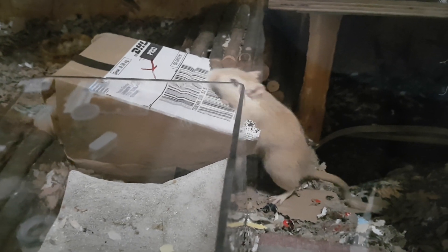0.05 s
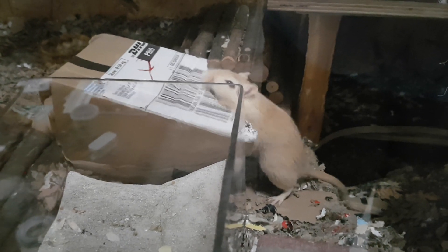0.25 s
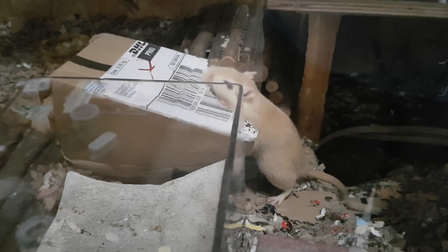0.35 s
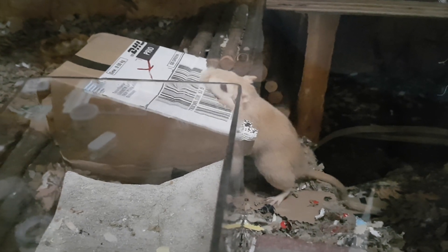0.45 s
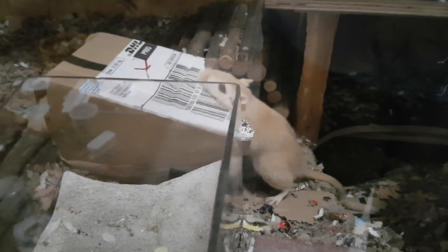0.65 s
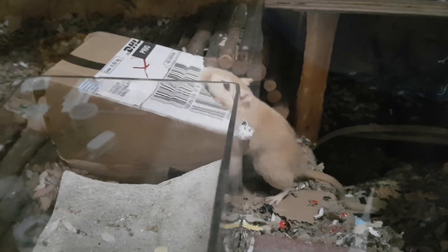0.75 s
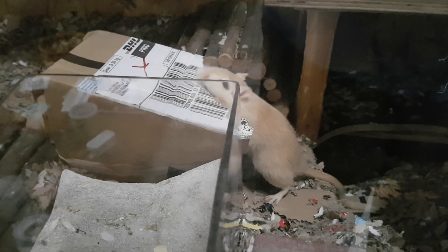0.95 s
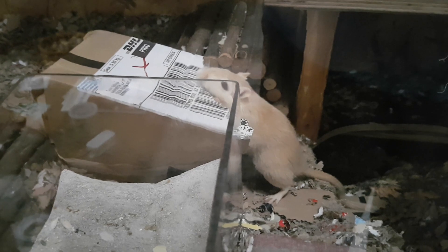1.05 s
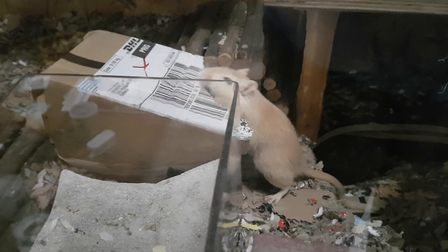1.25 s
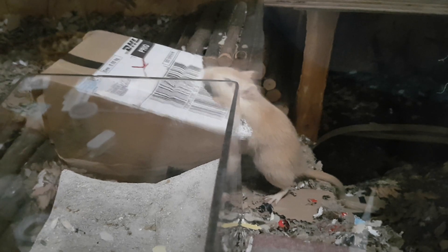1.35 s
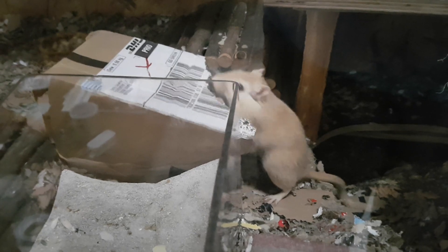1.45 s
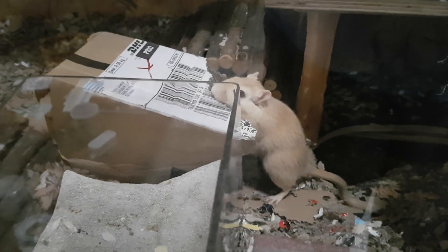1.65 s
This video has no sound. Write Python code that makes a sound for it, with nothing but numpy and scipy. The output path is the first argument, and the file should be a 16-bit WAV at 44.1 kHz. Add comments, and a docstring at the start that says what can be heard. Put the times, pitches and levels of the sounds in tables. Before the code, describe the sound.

A small rodent gnaws cardboard, slightly right of centre. After faint nibbles and a barely heard bump, a crunch comes at 0.22 s, stronger knocking bites at 0.49 and a close pair at 0.68-0.70, then the loudest, crispest snap at 0.94. A duller bite at 1.10, a weak tear at 1.26 and a light bite with soft low bump at 1.39 follow. Glassy tank echo, live room, quiet steady air.

```python
"""A gerbil gnaws the edge of a cardboard box in a glass tank, in a quiet, fairly live room.
Each bite snaps a burst of fibres, which rings the board, and lets the wall of the box spring back
with a hollow knock. Faint nibbles and paw shuffles fill the gaps. The box bumps very faintly at the
start, then more clearly, but still softly, at the last bite. The tank rings and echoes around it all,
the room adds its own echo, and a steady, quiet room tone lies beneath."""
import sys
import numpy as np
from scipy import signal
from scipy.fft import rfft, irfft
from scipy.io import wavfile
from scipy.ndimage import uniform_filter1d

SR = 44100
rng = np.random.default_rng(int(sys.argv[2]) if len(sys.argv) > 2 else 0)


def unload_wav(signal):
    """Save mono or channel-first audio to the path in sys.argv[1] as 16-bit WAV at rate SR, clipped to [-1, 1]."""
    wavfile.write(
        sys.argv[1],
        SR,
        np.round(np.clip(np.atleast_2d(signal).T, -1, 1) * 32767).astype(np.int16),
    )


N = 74970  # length of the scene in samples


def undb(db):
    """Turn decibels into a gain."""
    return 10 ** (np.asarray(db) / 20)


def unit(x):
    """Scale a sound to an energy of one."""
    return x / np.sqrt(np.sum(x ** 2) + 1e-18)


def steady(x):
    """Scale a sound that fills the scene to an average (RMS) level of one."""
    return unit(x) * np.sqrt(N)


def on_bins(points, values):
    """Join values by straight lines along a log-frequency axis."""
    return np.interp(np.log(np.fft.rfftfreq(N, 1 / SR) + 1), np.log(points), values)


def colour(table):
    """Turn a table of f/Hz, level/dB into a filter response that starts at once (minimum phase)."""
    hz, db = np.array(table).T
    cepstrum = irfft(np.log(undb(on_bins(hz, db))), N)
    # folding the second half onto the first leaves nothing before time zero
    cepstrum[1:N // 2] *= 2
    cepstrum[N // 2 + 1:] = 0
    return unit(irfft(np.exp(rfft(cepstrum)), N))


def ring(modes, size=12000):
    """Add up resonances (f/Hz, width/Hz, peak level/dB): wider ones die sooner; high treble is softened."""
    t = np.arange(size) / SR
    modal = np.zeros(size)
    for hz, width, db in modes:
        decay = np.exp(-np.pi * width * t)
        modal += undb(db) * width * decay * np.cos(2 * np.pi * hz * t)
    soften = signal.butter(3, 5020, fs=SR, output="sos")  # low-pass, Hz
    return unit(signal.sosfilt(soften, modal))


def through(x, response):
    """Play a sound through a response."""
    return signal.fftconvolve(x, response)[:N]


def place(x, start):
    """Lay a short sound into the scene at a time in seconds."""
    silence = np.zeros(max(int(start * SR), 0))
    return np.concatenate([silence, x, np.zeros(N)])[:N]


def highpass(x, hz, order=2):
    """Take away the bass."""
    return signal.sosfilt(signal.butter(order, hz, "high", fs=SR, output="sos"), x)


AIR_DB, AIR_WIDE_HZ = -65, 830  # average level; how slowly the two sides grow apart with pitch

# Colour of the quiet background: f/Hz, relative level/dB (per Hz)
AIR_COLOUR = [(20, 6), (35, -41), (55, 3), (105, -0.5), (160, -2.5), (260, -2), (500, -9.5), (1000, -17),
              (2000, -17.5), (4000, -25), (8000, -32.5), (15000, -26)]


def air():
    """Steady room tone: coloured noise, more alike on both sides in the bass than higher up."""
    hz = np.fft.rfftfreq(N, 1 / SR)
    gain = undb(on_bins(*np.array(AIR_COLOUR).T))
    mid = rfft(rng.standard_normal(N)) * gain
    side = rfft(rng.standard_normal(N)) * gain
    side = side * np.clip(0.42 + hz / AIR_WIDE_HZ / 2, 0, .9)
    both = irfft(np.array([mid + side, mid - side]), N)
    return unit(both) * np.sqrt(2 * N) * undb(AIR_DB)


ROOM_DB, ROOM_DELAY_S, ROOM_BUILD_S = -0.5, 0.0032, 0.0077  # added to all bands; wait; time to swell
ROOM_WIDE_HZ = 674  # here half of the echo's energy is shared by both sides

# Echo of the room by band: f/Hz, level/dB, time to fall 60 dB/s,
# balance/dB (left against right; each side takes half of it, times its side number)
ROOM_BANDS = [(102, -7.5, .55, -2), (250, -14, 0.76, -2), (435, 2.5, 0.43, -3.5), (787, -3, 0.32, -3),
              (1180, 4, 0.32, -4), (1580, 3.5, .36, -10.5), (3020, -3, 0.34, -6.5), (4800, -2.5, 0.32, -11),
              (7700, -2, 0.28, -7.5), (13500, -1, 0.2, 3)]


def room_echo(side, shared):
    """Many blurred reflections: noise dying away band by band at one side, with the bass shared by both."""
    t = np.arange(N) / SR
    hz, db, t60, balance = np.array(ROOM_BANDS).T
    alike = 1 / (1 + (np.fft.rfftfreq(N, 1 / SR) / ROOM_WIDE_HZ) ** 2)
    own = rfft(rng.standard_normal(N))
    noise = np.sqrt(alike) * shared + np.sqrt(1 - alike) * own
    build = 1 - np.exp(-np.maximum(t - ROOM_DELAY_S, 0) / ROOM_BUILD_S)
    out = np.zeros(N)
    for k, share in enumerate(np.eye(len(hz))):
        band = irfft(noise * on_bins(hz, share), N)  # overlaps only with its neighbours
        fade = unit(build * undb(-60 * t / t60[k]))
        out += band * fade * undb(db[k] + side * balance[k] / 2)
    return undb(ROOM_DB) * out


GLASS_DB, GLASS_T60_S, GLASS_PER_S = 0.5, 0.013, 9400  # level; time to fall 60 dB; reflections per second


def glass_echo():
    """Quick, bright reflections between the panes of the tank: random clicks that die fast."""
    t = np.arange(N) / SR
    clicks = (rng.random(N) < GLASS_PER_S / SR) * rng.standard_normal(N)
    fading = clicks * np.exp(-np.log(1000) * t / GLASS_T60_S)
    return undb(GLASS_DB) * unit(highpass(fading, 880))


TANK_DB, TANK_LEFT_DB = -20.5, -9  # level on the right; the left against the right

# Lingering resonances of the tank: f/Hz, width/Hz, relative peak level/dB
TANK_MODES = [(436.3, 27, 9.5), (1043, 53, 3), (1102, 26, 2.5), (1538, 30, -5), (1697, 27, -25),
              (1835, 28, 20), (2050, 38, -6), (3080, 32, 10)]


def tank_ring(source):
    """The sounds inside set the tank ringing at its own pitches."""
    return undb(TANK_DB) * through(source, ring(TANK_MODES))


# Loose walls of the box: f/Hz, width/Hz, relative peak level/dB
WALL_MODES = [(83, 35, 2), (167.6, 20, 5.5), (217.6, 20, 5.5), (437, 53, -16.5), (593, 20, -7)]


def loose_walls():
    """The low ringing of the loose walls."""
    return ring(WALL_MODES)


# Hollow inside of the box: f/Hz (before the pitch ratio), width/Hz, relative peak level/dB
HOLLOW_MODES = [(250, 180, -9.5), (269, 130, 3), (375, 23, -13.5), (451.6, 67, 2.5), (562, 54, -3.5),
                (622, 20, -5)]


def hollow_box(pitch=1):
    """The hollow ringing of the box, with all its pitches moved by one ratio."""
    return ring([(hz * pitch, width, db) for hz, width, db in HOLLOW_MODES])


# Stiff board: f/Hz, width/Hz, relative peak level/dB (before the tilt)
BOARD_MODES = [(750, 110, -12), (1101, 59, 7), (1250, 210, -4), (1713, 200, -4), (1845, 150, 2),
               (2110, 154, -1), (2305, 300, 2), (2796, 254, 1.5), (3097, 163, 1.5), (3326, 146, 0),
               (4300, 440, -15), (4810, 200, -22)]


def stiff_board(tilt_db=0):
    """The brighter ringing of the board itself; a tilt in dB per octave makes it brighter or duller."""
    return ring([(hz, width, db + tilt_db * np.log2(hz)) for hz, width, db in BOARD_MODES])


SHUFFLE_DB, SHUFFLES_PER_S = -70, 160  # level before the effort; pats per second

# Effort of the paws: t/s, level/dB (added to the shuffle level)
PAW_EFFORT = [(0, -0.5), (.4, -4), (.95, 4.5), (1.3, -3), (1.7, -18)]


def shuffle():
    """Paws pat and shift against the box: random taps ring its walls, its inside and its board."""
    pats = (rng.random(N) < SHUFFLES_PER_S / SR) * rng.standard_normal(N)
    box = loose_walls() + undb(-10.5) * hollow_box() + undb(-20) * stiff_board()
    sound = steady(highpass(through(pats, box), 87))
    effort_db = np.interp(np.arange(N) / SR, *np.array(PAW_EFFORT).T)
    return sound * undb(SHUFFLE_DB + effort_db)


BUMP_HZ, BUMP_SAG_HZ_PER_S, BUMP_WOBBLE = 110.7, 230, 0.097  # wobble is a fraction of the pitch
BUMP_RISE_S, BUMP_DECAY_S = 0.017, .027
FLUTTER_DB, FLUTTER_DECAY_S = -12.5, 0.046

# Soft bumps of the box: t/s, level/dB (before the swell and decay)
BOX_BUMPS = [(0.005, -53.5), (1.395, -39)]


def bump():
    """The box rocks: a low swell that wobbles and sags in pitch, with a flutter of its walls."""
    out = np.zeros(N)
    for start, db in BOX_BUMPS:
        t = np.maximum(np.arange(N) / SR - start, 0)
        swell = 1 - np.exp(-(t / BUMP_RISE_S) ** 2)
        wobble = steady(uniform_filter1d(rng.standard_normal(N), size=400))
        hz = (BUMP_HZ - BUMP_SAG_HZ_PER_S * t) * (1 + BUMP_WOBBLE * wobble) * (t > 0)
        rocking = np.sin(2 * np.pi * np.cumsum(hz) / SR) * np.exp(-t / BUMP_DECAY_S)
        rattle = steady(through(rng.standard_normal(N), loose_walls()))
        flutter = rattle * np.exp(-t / FLUTTER_DECAY_S)
        out += undb(db) * swell * (rocking + undb(FLUTTER_DB) * flutter)
    return out


SNAPS_PER_S, FIBRES_PER_S, SNAP_SPREAD_DB = 3000, 4600, 7.5  # coarse breaks; fine breaks; uneven strength
CRACK_GROWTH_DB, FIZZ_GROWTH_DB = 7, -4  # change of strength over a burst


def snaps(length, rate, growth_db, size=2048, order=96):
    """A burst of fibres breaking at random moments, evened out so that it has no colour of its own."""
    chance, strength = rng.random(size), rng.standard_normal((2, size))
    progress = np.arange(size) / max(length * SR, 2)
    breaks = (progress < 1) & (chance < rate / SR)
    breaks[0] = True  # the first fibre always breaks at once
    spread_db = SNAP_SPREAD_DB * np.minimum(strength[1], 1.5)
    gain = undb(spread_db + growth_db * np.minimum(progress, 1))
    burst = breaks * np.sign(strength[0]) * gain
    # linear prediction: how the burst resembles itself gives the filter that flattens it
    likeness = np.correlate(burst, burst, "full")[size - 1:]
    lag = np.arange(order)
    evener = np.linalg.solve(likeness[abs(lag[:, None] - lag)], lag == 0)
    return unit(signal.lfilter(evener, 1, burst))


# Fine fibres tearing: f/Hz, relative level/dB (before the tilt)
FIZZ_COLOUR = [(500, -21), (2000, -9), (4000, 0.5), (6200, -6), (8100, -1), (10500, -5.5), (13000, 0),
               (16000, -6.5)]


def fibre_fizz(tilt_db):
    """The hissy colour of fine fibres, with a tilt in dB per octave."""
    return colour([(hz, db + tilt_db * np.log2(hz)) for hz, db in FIZZ_COLOUR])


KNOCK_DB, CRACK_DB, FIZZ_DB = -9.5, -11.5, -21.5  # added to the levels of every bite and nibble
FIZZ_STRETCH = 1.2  # fine fibres go on a little longer


def tear(start, length, crack_db, fizz_db, tilt_db, board):
    """Coarse fibres ring the board while fine ones fizz; the bass is taken from both."""
    coarse = snaps(length, SNAPS_PER_S, CRACK_GROWTH_DB)
    fine = snaps(length * FIZZ_STRETCH, FIBRES_PER_S, FIZZ_GROWTH_DB)
    crack = unit(through(place(coarse, start), board))
    fizz = unit(through(place(fine, start), fibre_fizz(tilt_db)))
    both = undb(CRACK_DB + crack_db) * crack + undb(FIZZ_DB + fizz_db) * fizz
    return highpass(both, 336)


PUSH_S, REBOUND_AT = .0011, 0.6645  # length of a push; start of the rebound as a fraction of the tear
REBOUND_DB, KNOCK_GRIT_DB = 10, 5.5  # rebound against the first jerk; snaps against both pushes


def knock(start, length, hollow, size=2048):
    """The wall jerks as the tear starts and springs back later in it; so small a wall radiates little bass."""
    t = np.arange(size) / SR

    def push(at):
        return np.sin(np.pi * np.clip((t - at) / PUSH_S, 0, 1)) ** 2

    force = unit(-push(0) - undb(REBOUND_DB) * push(REBOUND_AT * length))
    force = force + undb(KNOCK_GRIT_DB) * snaps(length, SNAPS_PER_S, CRACK_GROWTH_DB)
    return unit(highpass(through(place(force, start), hollow), 200, order=4))


NIBBLE_S = 0.00531  # length of the tear

# Light nibbles: t/s, knock level/dB, crack level/dB, fizz level/dB (each added to its shared level)
LIGHT_NIBBLES = [(0.048, -28, -41, -43), (0.174, -27, -33.5, -31), (0.231, -21, -16, -12),
                 (0.399, -25, -36.5, -45), (0.642, -24, -31, -27), (1.075, -22.5, -23, -15.5),
                 (1.121, -28, -25, -28), (1.276, -25, -30.5, -17.5), (1.559, -29, -37, -36)]


def nibbling():
    """Light nibbles: small tears and knocks, all of one length and with the same box and board."""
    out = np.zeros(N)
    hollow, board = hollow_box(), stiff_board()
    for start, knock_db, crack_db, fizz_db in LIGHT_NIBBLES:
        out += tear(start, NIBBLE_S, crack_db, fizz_db, 0, board)
        out += undb(KNOCK_DB + knock_db) * knock(start, NIBBLE_S, hollow)
    return out


# Bites: t/s, length of the tear/s, knock level/dB, crack level/dB, crack tilt/(dB per octave),
# fizz level/dB, fizz tilt/(dB per octave), pitch of the knock (ratio); levels add to the shared ones
GNAWING_BITES = [(0.2168, 0.0056, -9.5, -4.5, 0, -9, -4, 0.96),
                 (0.488, 0.0056, -1.5, -4.5, 4.5, -4, -4.5, 0.96),
                 (0.6763, 0.0057, -1.5, -1.5, -0.5, -14, 0, 1.01),
                 (0.701, 0.0054, -14.5, -0.5, -1, -4.5, -4.5, 0.97),
                 (0.940, .0056, -2.5, 1.5, 0, 7, -6.5, 0.89),
                 (1.0956, 0.0046, -17, -16, -17, -2, -4.5, 0.98),
                 (1.0993, 0.00556, -9.5, -10.5, -16.5, -3, -1, 1.32),
                 (1.2582, .014, -20.5, -19.5, -6.5, -12.5, -5, 1.02),
                 (1.3858, 0.0063, -15, -21.5, 0.5, -9.5, -0.5, 1.02)]


def gnawing():
    """Bites that tear the board and knock the box, each with its own brightness and pitch."""
    out = np.zeros(N)
    for start, length, knock_db, crack_db, crack_tilt_db, fizz_db, fizz_tilt_db, pitch in GNAWING_BITES:
        out += tear(start, length, crack_db, fizz_db, fizz_tilt_db, stiff_board(crack_tilt_db))
        out += undb(KNOCK_DB + knock_db) * knock(start, length, hollow_box(pitch))
    return out


LEFT_LAG_S, LEFT_DB = .00013, -2.5  # direct sound: later on the left; left level against the right


def scene():
    """The animal is a little to the right, heard directly, off the glass and through the room."""
    source = shuffle() + bump() + nibbling() + gnawing()
    tank = tank_ring(source)
    left = undb(LEFT_DB) * (place(source, LEFT_LAG_S) + through(source, glass_echo()))
    left = left + undb(TANK_LEFT_DB) * tank
    right = source + through(source, glass_echo()) + tank
    shared = rfft(rng.standard_normal(N))
    left = left + through(source, room_echo(0.87, shared))
    right = right + through(source, room_echo(-1, shared))
    return np.array([left, right]) + air()


def record(dry):
    """The recorder cuts the top: a steep low-pass at 16100 Hz."""
    return signal.sosfilt(signal.ellip(10, .2, 70, 16100, fs=SR, output="sos"), dry)


dry = scene()
out = record(dry)
unload_wav(out)
```